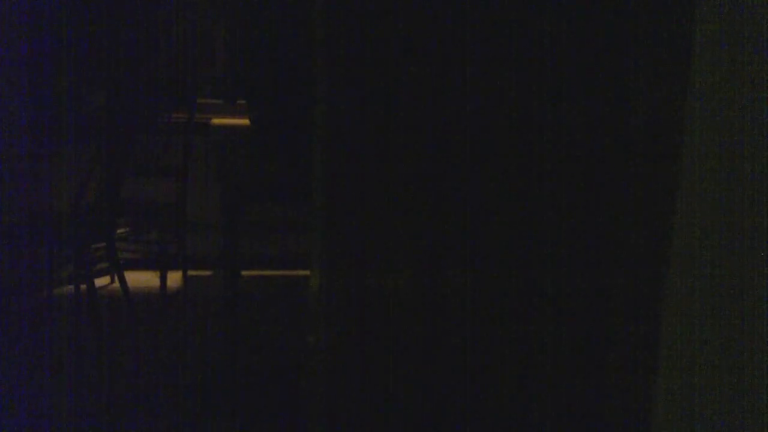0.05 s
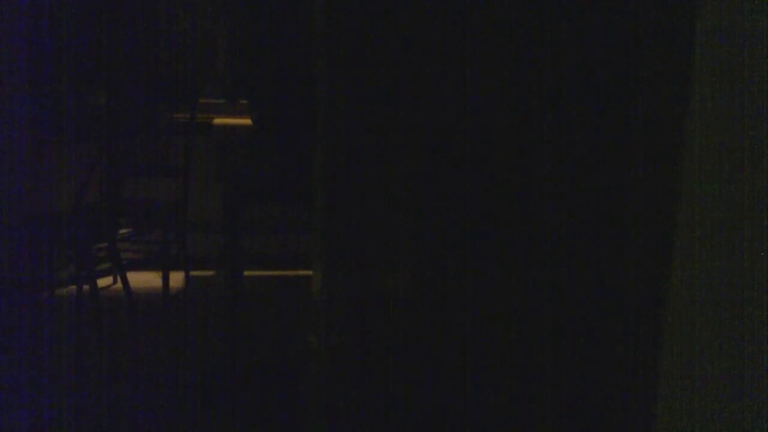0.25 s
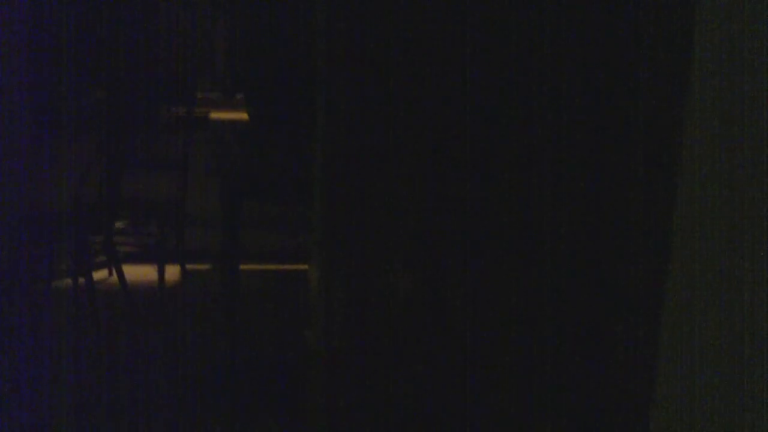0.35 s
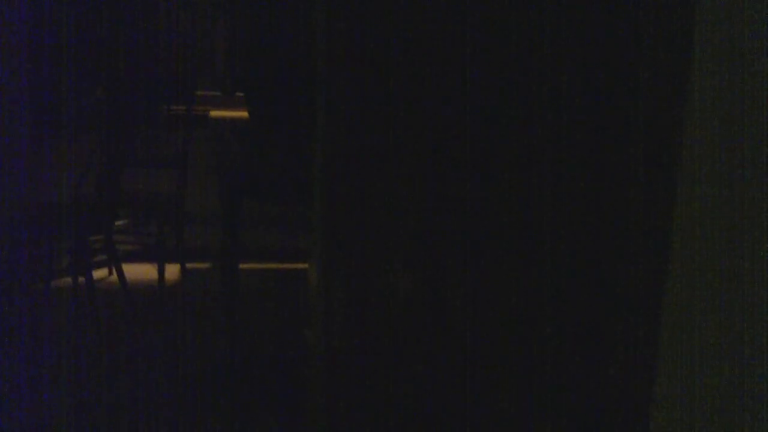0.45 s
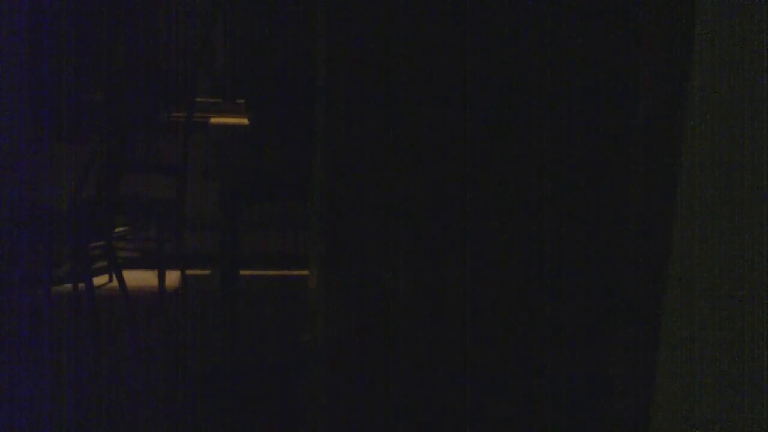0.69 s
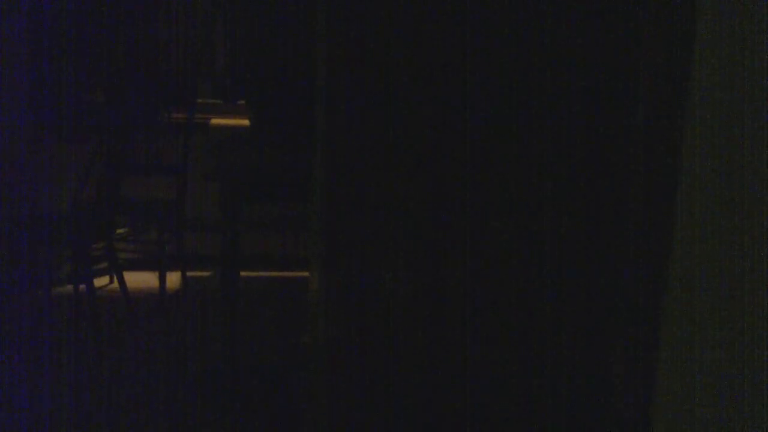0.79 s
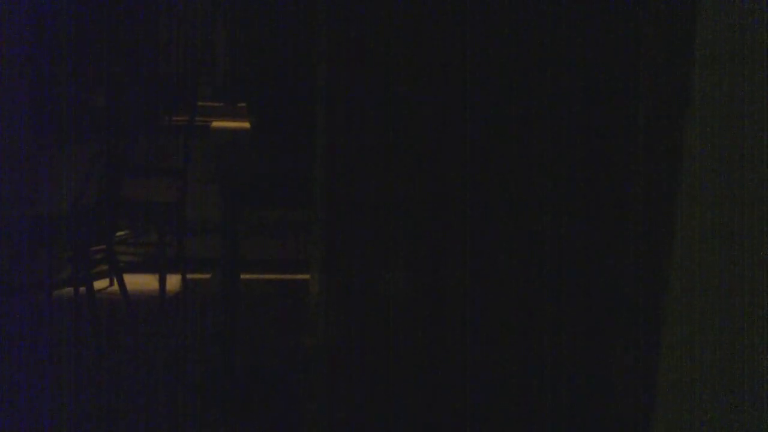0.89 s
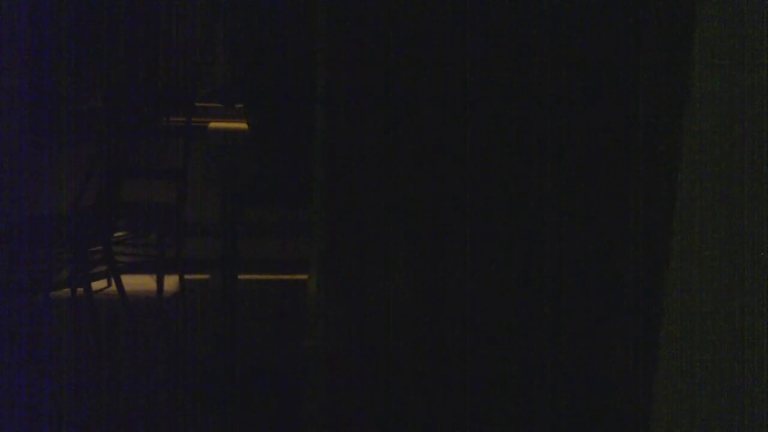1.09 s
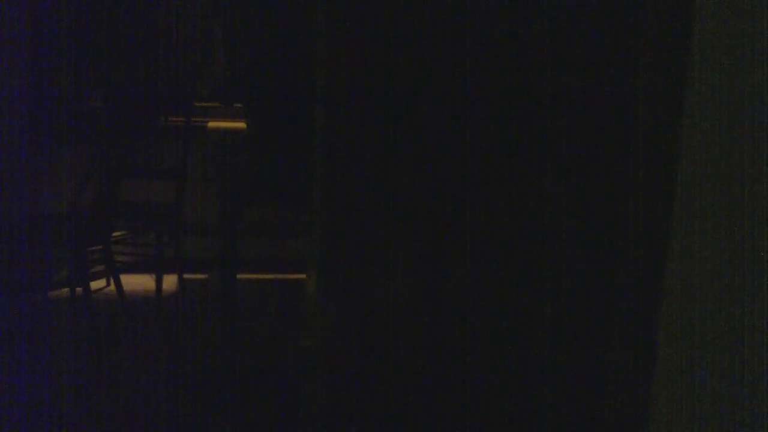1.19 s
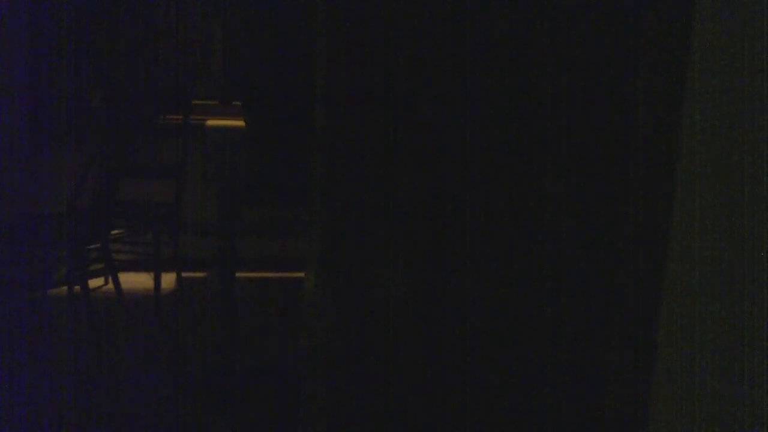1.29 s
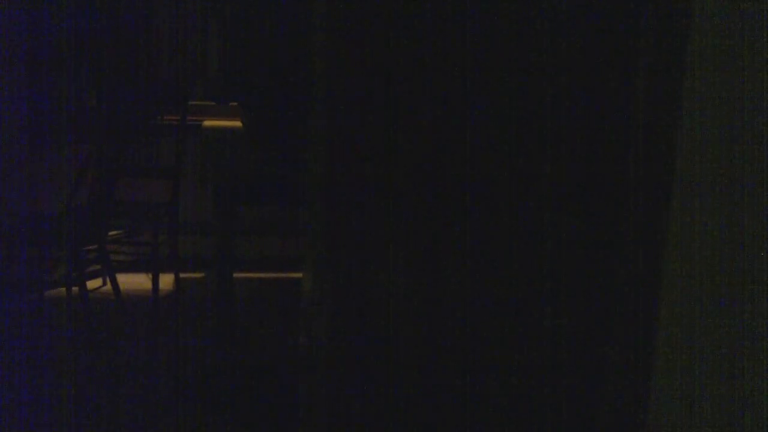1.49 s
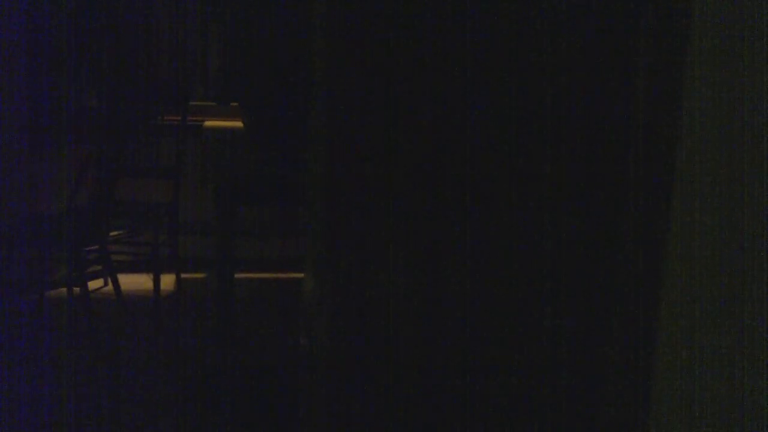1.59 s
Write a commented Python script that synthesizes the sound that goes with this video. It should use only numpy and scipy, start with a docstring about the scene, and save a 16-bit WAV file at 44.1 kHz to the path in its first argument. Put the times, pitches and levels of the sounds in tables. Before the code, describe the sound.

A puppy shut in a kennel yelps three times, hoarse and shrill, in a small hard room

```python
"""A yelp dies away with a faint tick, then a puppy shut in a kennel yelps three times in a small hard room,
some way from a camera. Each yelp starts as a hoarse chest voice (pulses and breath through mouth and throat),
breaks into a high whistle (a few sine partials) and drops back to a low grunt.
The room rings on (random taps and decaying sines). Under it lie mains hum, rumble, hiss,
the camera's pulsing whine (a gated sine), faint high chirps and soft low bumps."""
import sys
import numpy as np
from scipy import signal
from scipy.fft import rfft, irfft
from scipy.io import wavfile
from scipy.ndimage import uniform_filter1d

SR = 44100
rng = np.random.default_rng(int(sys.argv[2]) if len(sys.argv) > 2 else 0)


def master_out(mix):
    """Clip the mix to full scale and print it as 16-bit PCM to the path in sys.argv[1]."""
    frames = np.transpose(np.atleast_2d(mix))
    ceiling = np.clip(frames, -1, 1)
    pcm = np.round(ceiling * 32767).astype(np.int16)
    wavfile.write(sys.argv[1], SR, pcm)


def to_linear_factor(level_db):
    """Convert decibel levels (scalar or array-like) to linear amplitude factors."""
    exponent = np.asarray(level_db, float) / 20
    return 10 ** exponent


N = 72765  # samples
EDGE_HZ = 15020  # upper band limit


def evened(x):
    """Scales to rms 1."""
    return x / np.sqrt(np.mean(x ** 2) + 1e-20)


def read(points, hz):
    """Reads a spectrum table on a log-frequency axis."""
    f, value = np.transpose(points)
    return np.interp(np.log(hz + 1), np.log(f + 1), value)


def add(mix, start_s, sound):
    """Mixes a sound in at start_s."""
    part = mix[round(start_s * SR):][:len(sound)]
    part += sound[:len(part)]


def controls(rows):
    """Turns table rows into sample-rate curves, one per column after time."""
    rows = np.array(rows)
    t = np.arange(rows[0, 0], rows[-1, 0], 1 / SR)
    return [np.interp(t, rows[:, 0], column) for column in rows.T[1:]]


def wobble(count, size):
    """Smooth random wander of rms 1: white noise averaged twice over size samples."""
    white = rng.standard_normal(N)[:count]
    return evened(uniform_filter1d(uniform_filter1d(white, size), size))


def noise(points):
    """Steady noise with the given spectrum, rms 1."""
    z = rfft(rng.standard_normal(N))
    return evened(irfft(z * to_linear_factor(read(points, np.fft.rfftfreq(N, 1 / SR))), N))


def rumble():
    """Low-frequency noise, independent in mid and side."""
    # rumble spectrum: freq_hz, relative_db
    rumble_colour = [(10, 10), (25, 7), (45, -2), (60, 0), (90, -15.5), (125, -5), (260, -14), (400, -32),
                     (660, -67)]
    mid_db, side_re_mid_db = -53.5, -6
    mid = to_linear_factor(mid_db) * noise(rumble_colour)
    side = to_linear_factor(mid_db + side_re_mid_db) * noise(rumble_colour)
    return mid, side


def hiss():
    """Broadband noise; the mid flickers in level, the side is weaker and steady."""
    # mid hiss spectrum: freq_hz, relative_db
    mid_colour = [(300, -23), (3000, 10), (7300, -5.5), (7750, 12), (8300, -9.5), (11000, -5), (15000, -5)]
    # side hiss spectrum: freq_hz, relative_db
    side_colour = [(3000, -30), (6000, 0), (9000, 3), (12500, -0.5), (15000, 2)]
    mid_db, side_re_mid_db, flicker_db = -61, -16, 2
    mid = to_linear_factor(mid_db + flicker_db * wobble(N, size=120)) * noise(mid_colour)
    side = to_linear_factor(mid_db + side_re_mid_db) * noise(side_colour)
    return mid, side


def hum():
    """Steady mains hum: sines at random phase."""
    # hum tones: freq_hz, rms_db
    hum_tones = [(50, -56.5), (120, -74)]
    t = np.arange(N) / SR
    return sum(np.sqrt(2) * to_linear_factor(db) * np.sin(2 * np.pi * (hz * t + rng.random())) for hz, db in hum_tones)


def camera_whine():
    """High sine gated on and off at a fixed rate, with softened edges."""
    whine_hz, rms_on_db = 12000, -71
    first_s, period_s, on_s = .0585, 1 / 15, .031
    t = np.arange(N) / SR
    gate = uniform_filter1d(1. * ((t - first_s) % period_s < on_s), size=60)
    return np.sqrt(2) * to_linear_factor(rms_on_db) * gate * np.sin(2 * np.pi * whine_hz * t)


def thumps():
    """Soft low bumps: about two sine cycles under a half-sine envelope."""
    # bumps: start_s, envelope_peak_db
    bump_events = [(.29, -41), (0.324, -44), (0.375, -44), (0.441, -44.5)]
    bump_hz, length_s = 43.1, 0.047
    t = np.arange(0, length_s, 1 / SR)
    bump = np.sin(np.pi * t / length_s) * np.sin(2 * np.pi * bump_hz * t)
    out = np.zeros(N)
    for start_s, peak_db in bump_events:
        add(out, start_s, to_linear_factor(peak_db) * bump)
    return out


def chirps():
    """Faint short bursts of one fixed high tone."""
    # chirps: start_s, peak_db
    chirp_events = [(0.0194, -57), (0.1047, -58.5), (0.623, -62), (1.1059, -56), (1.6242, -57)]
    chirp_hz, length_s = 7770, .016
    t = np.arange(0, length_s, 1 / SR)
    chirp = np.sin(np.pi * t / length_s) ** .5 * np.sin(2 * np.pi * chirp_hz * t)
    out = np.zeros(N)
    for start_s, peak_db in chirp_events:
        add(out, start_s, to_linear_factor(peak_db) * chirp)
    return out


def tick():
    """One tick: a few high modes, each a decaying sine."""
    # tick modes: freq_hz, relative_db, t60_s
    tick_modes = [(6100, -12.5, 0.018), (9400, -1, 0.005), (11100, -10, 0.0066), (13500, -7, .006)]
    start_s, tick_db, length_s = .012, -31, .016
    t = np.arange(0, length_s, 1 / SR)
    ring = sum(to_linear_factor(tick_db + db - 60 * t / t60_s) * np.sin(2 * np.pi * hz * t) for hz, db, t60_s in tick_modes)
    out = np.zeros(N)
    add(out, start_s, ring)
    return out


def room():
    """Impulse response: direct sound, a dense tail dying by band, and the strongest standing waves."""
    # tail decay time: freq_hz, t60_s
    tail_t60 = [(300, 1), (800, 0.47), (2000, 0.51), (5500, 0.46), (14000, 0.6)]
    # tail spectrum at its start: freq_hz, relative_db
    tail_colour = [(300, -18.5), (600, -6.5), (900, 0.5), (5000, -1.5), (14000, -0.5)]
    # standing waves: freq_hz, relative_db
    standing_waves = [(571, -34.5), (612, -33), (673, -33), (732, -37), (802, -42.5), (893, -31),
                      (1001, -58), (1121, -40), (1351, -28.5), (1637, -33), (1770, -33.5), (1943, -28.5),
                      (2304, -30.5), (2471, -27), (3525, -38.5)]
    direct_db, tail_db, modes_db, mode_width_hz = -6, -1.5, -14.5, 12.9
    t = np.arange(SR) / SR
    # one tap of random sign at a random place in every 20 samples
    slots = (SR - 101) // 20
    taps = np.zeros(SR)
    taps[np.arange(100, SR - 20, 20) + rng.integers(0, 20, slots)] = rng.choice([-1., 1.], slots)
    hz, frame_s, z = signal.stft(taps, SR, nperseg=256)
    decay_db = -60 * frame_s / read(tail_t60, hz)[:, None]
    z = z * to_linear_factor(read(tail_colour, hz)[:, None] + decay_db)
    tail = signal.istft(z, SR, nperseg=256)[1][:SR]
    decay = np.exp(-np.pi * mode_width_hz * t)
    modes = sum(to_linear_factor(db) * decay * np.sin(2 * np.pi * f * t) for f, db in standing_waves)
    out = to_linear_factor(tail_db) * tail / np.linalg.norm(tail) + to_linear_factor(modes_db) * modes / np.linalg.norm(modes)
    out[0] += to_linear_factor(direct_db)
    return out


def rasp(rows):
    """Air tearing through the narrowed throat, in uneven grains."""
    # breath spectrum: freq_hz, relative_db
    rasp_colour = [(900, -8.5), (2000, -0.5), (4300, -2), (4900, -33), (6000, -14.5), (9000, -27),
                   (12000, -23), (15000, -34)]
    grain_db = 3
    level_db, = controls(rows)
    grains = grain_db * wobble(len(level_db), size=60)
    return to_linear_factor(level_db + grains) * noise(rasp_colour)[:len(level_db)]


def whistle(rows):
    """A nearly pure high tone with a few overtones and a little air."""
    # overtone spectrum: freq_hz, relative_db
    overtone_colour = [(2300, -5.5), (3300, -16), (3550, -6), (4200, -19), (4900, -19), (5250, -20.5),
                       (5700, -33), (6500, -21.5), (7100, -34.5), (8000, -41.5), (9800, -38.5),
                       (15000, -60)]
    jitter, air_db = .009, -27.5
    clear_from_hz, veil_db_per_oct = 1600, 180  # below this pitch overtones 3 and up are veiled
    hz, level_db, over_db = controls(rows)
    turns = np.cumsum(hz * (1 + jitter * wobble(len(hz), size=150))) / SR
    veil_db = veil_db_per_oct * np.minimum(np.log2(hz / clear_from_hz), 0)
    tone = np.cos(2 * np.pi * turns)
    for k in range(2, 10):
        gain_db = over_db + read(overtone_colour, k * hz) + (k > 2) * veil_db
        tone = tone + to_linear_factor(gain_db) * (k * hz < EDGE_HZ) * np.cos(2 * np.pi * k * turns)
    air = 1 + to_linear_factor(air_db) * wobble(len(hz), size=6)
    return np.sqrt(2) * to_linear_factor(level_db) * tone * air


def mouth_and_throat(drive, level_db, mouth_hz, slope_db_per_oct):
    """Time-varying filter on fold pulses and breath: mouth resonance, throat colour, treble by effort."""
    # throat response: freq_hz, gain_db
    throat_colour = [(200, -40), (330, 22), (500, 12.5), (1400, 4), (2200, 3.5), (3600, -2), (4250, -12),
                     (4600, -16.5), (5100, -14), (5900, -19), (7700, -24.5), (8600, -27), (15000, -45)]
    mouth_width_hz, below_mouth_db_per_oct = 700, 29.5
    far_slope_share = 0.37  # beyond the first octave over the mouth the slope changes in proportion
    breath_ease = 0.83  # the breath loses less treble than the pulses
    treble_from_hz, treble_per_effort, full_effort_db = 570, 0.28, 2.5  # quiet voice is also duller
    f, t, (z, air) = signal.stft(drive, SR, nperseg=512, noverlap=448)
    f = f[:, None]
    at = np.minimum(np.round(t * SR).astype(int), len(level_db) - 1)
    mouth_hz, slope = mouth_hz[at], slope_db_per_oct[at]
    octaves = np.log2((f + 1) / mouth_hz)
    z = z + air * to_linear_factor(-breath_ease * np.minimum(slope, 0) * np.clip(octaves, 0, 2))
    near_slope = np.where(octaves > 0, slope, below_mouth_db_per_oct)
    bent_octaves = np.where(octaves > 1, 1 + far_slope_share * (octaves - 1), octaves)
    gain = to_linear_factor(read(throat_colour, f) + near_slope * bent_octaves)
    gain = gain * (1 + 1 / (1 + ((f - mouth_hz) / mouth_width_hz * 2) ** 2))
    duller_db = treble_per_effort * np.minimum(level_db[at] - full_effort_db, 0)
    z = z * gain * to_linear_factor(duller_db * np.clip(np.log2((f + 1) / treble_from_hz), 0, 2))
    # even out frame power so that the level curve alone sets loudness
    z = z / np.sqrt(uniform_filter1d(2 * (abs(z) ** 2).sum(0) / 1.5, size=9) + 1e-12)
    return signal.istft(z, SR, nperseg=512, noverlap=448)[1][:len(level_db)]


def chest(rows):
    """Uneven strong-weak fold pulses and puffs of air pass the mouth and throat."""
    jitter, shimmer_db, onset_s = .09, 2, .01
    hz, level_db, half, rough, mouth_hz, slope = controls(rows)
    half, rough = np.clip(half, 0, 1), np.clip(rough, 0, 1)
    # turns count at half the pitch: odd partials make pulses alternate strong-weak
    turns = np.cumsum(hz / 2 * (1 + jitter * (rough + 0.1426) * wobble(len(hz), size=80))) / SR
    folds = np.zeros(len(hz))
    for k in range(1, 60):
        share = half if k % 2 else 1
        folds += share * (k * hz < 32000) * np.cos(2 * np.pi * k * turns)
    puffs = (0.7 + np.exp(-(turns % 1) / 0.67)) * rng.standard_normal(N)[:len(hz)]
    drive = np.array([np.sqrt(1 - rough ** 2) * evened(folds), rough * evened(puffs)])
    voice = mouth_and_throat(drive, level_db, mouth_hz, slope)
    swell = np.minimum(np.arange(len(hz)) / SR / onset_s, 1)
    return swell * to_linear_factor(level_db + shimmer_db * wobble(len(hz), size=150)) * voice


def puppy():
    """All voice layers in the room; a yelp begun before the start ends as the sound opens."""
    # chest voice before the room, one table per yelp:
    # time_s, pitch_hz, level_db, half_pitch_share (0-1), roughness (0-1), mouth_hz, treble_slope_db_per_oct
    chest_yelps = [
        [(-.15, 741, -21, 1, 0.7, 776, 10), (-.03, 750, -30, 0.86, 0.26, 730, -6),
         (0.0, 711.6, -36, 0.3, 0.07, 696, 13.5), (.04, 518, -44.5, 0.9, 0.3, 500, 16)],
        [(.14, 605.5, -41.5, 1, 0.91, 950, -22), (.17, 682, -29.5, 1, 0.56, 800, 8),
         (.2, 789.7, -19, 1, 0.71, 727, 1), (.235, 860.2, -19, 1, 0.6, 820, 3),
         (.265, 656.6, -13.5, 1, 0.31, 920, 3), (.305, 662.9, -12, 0.28, 0.36, 864, 4),
         (.325, 444.6, -14, 1, 0.37, 850, 3), (.345, 453.5, -19, 1, 0.23, 900, 5.5),
         (.42, 454.5, -29.5, 1, 0.51, 1170, -14.5), (.5, 553.2, -34.5, 1, 0.66, 1050, 12),
         (.54, 472, -33, 0.92, 0.81, 693, -69)],
        [(.678, 550.6, -33.5, 0.5, 0, 600, -6), (.706, 670, -28, .05, 0.16, 702.2, 4),
         (.72, 765.2, -6.5, .05, 0.17, 780, -27), (.74, 805, -19, 0.4, 0.32, 765, 3.5),
         (.76, 809, -10, 0.4, 0.52, 796, 1.5), (.79, 639, -14.5, 0.12, 0.5, 926, -2.5),
         (.82, 642.7, -15, 1, 0.41, 939, 11.5), (.85, 666, -24, 1, 0.56, 1310, -14),
         (.9, 645.4, -25.5, 0.5, 0.54, 1300, -46), (.94, 543, -38.5, 1, 0.69, 720, -2),
         (.965, 458.2, -26, 1, 0.08, 508, 3), (.99, 425.8, -28.5, 0.3, 0.71, 490, -10),
         (1.015, 558, -32, 0.24, 1, 520, -15), (1.05, 372, -45, 0.2, 0.5, 467, -20)],
        [(1.17, 539.7, -35, 0.4, 0.33, 594, -5), (1.188, 580.7, -32.5, 0.8, 0.4, 597, -0.5),
         (1.204, 688.3, -22.5, 0.7, 0.11, 710, 0), (1.222, 739.9, -15.5, 0.62, 0.25, 706, -16),
         (1.27, 737.5, -17.5, 0.93, 0.55, 750, 0), (1.3, 755.6, -20.5, 0.2, 0.7, 800, -17.5),
         (1.34, 786.8, -54, 0.8, 0.12, 835, 22), (1.42, 794.8, -25.5, 0.2, 0.11, 844, 10.5),
         (1.445, 613.8, -49, .1, 0.6, 610, -16), (1.475, 471.7, -24, 0.8, 0.7, 487, 3),
         (1.495, 419.4, -45, 0.2, 0.65, 460, -23), (1.525, 570, -25, 0.4, 0.16, 540, -23),
         (1.542, 471, -78, 0.1, 0.38, 480, -14), (1.568, 532, -25.5, 0.7, 0.56, 480, -29),
         (1.61, 388, -75, 0.5, 0.2, 356, -14.5)],
    ]
    # whistle register before the room, one table per strand (the last yelp splits in two):
    # time_s, pitch_hz, level_db, overtones_db
    whistle_strands = [
        [(-.2, 1838, -40, -2), (-.15, 1898, -46, 19), (0.0, 1782, -36, -1)],
        [(.315, 1572, -13, -20), (.333, 1557, -13.5, -35.5), (.36, 1631, -23, 4), (.39, 1622, -13, -1),
         (.42, 1620, -46, -16), (.46, 1616, -28, -3), (.48, 1209, -25, -22), (.505, 1135, -38, -16),
         (.53, 1120, -64, 1)],
        [(.8, 1486, -14.5, -24), (.83, 1572, -14.5, -6.5), (.86, 1636, -24, 11), (.885, 1576, -24.5, -22),
         (.91, 1487, -20, -33), (.93, 1353, -29.5, -25), (.955, 1110, -20.5, -6.5), (.99, 1130, -78, -1)],
        [(1.25, 1265, -65, 5), (1.275, 1427, -17.5, -1), (1.295, 1410, -27, 9), (1.32, 1731, -17.5, -4.5),
         (1.345, 1752, -31.5, 11.5), (1.39, 1740, -19.5, -0.5), (1.43, 1770, -27, 1), (1.45, 1824, -35, -5)],
        [(1.32, 1662, -51, -5), (1.345, 1682, -19, 3), (1.38, 1612, -22.5, 0.5), (1.405, 1295, -34, 5.5),
         (1.435, 1151, -26, -9), (1.455, 1112, -24, -8), (1.49, 1065, -78.5, -23)],
    ]
    # breath rasp before the room as each yelp climbs: time_s, level_db
    rasp_climbs = [
        [(.15, -48), (.21, -36), (.27, -36)],
        [(.68, -43), (.72, -42.5), (.77, -31.5)],
        [(1.18, -45), (1.231, -40), (1.291, -31), (1.339, -54), (1.4, -62)],
    ]
    lead_s = .3  # run-in, cut off after the room
    lead = round(lead_s * SR)
    dry = np.zeros(N + lead)
    for voice, tables in ((chest, chest_yelps), (whistle, whistle_strands), (rasp, rasp_climbs)):
        for rows in tables:
            add(dry, rows[0][0] + lead_s, voice(rows))
    return signal.fftconvolve(dry, room())[lead:lead + N]


def scene():
    """Everything in the middle; only rumble and hiss differ a little left to right."""
    rumble_mid, rumble_side = rumble()
    hiss_mid, hiss_side = hiss()
    small_sounds = hum() + camera_whine() + thumps() + chirps() + tick()
    mid = rumble_mid + hiss_mid + small_sounds + puppy()
    side = rumble_side + hiss_side
    return np.array([mid + side, mid - side])


def top_cut(x):
    """Nothing passes above the cut-off."""
    return signal.sosfilt(signal.butter(12, 15160, fs=SR, output="sos"), x)


def record(dry):
    """Soft ceiling on the loudest peaks, small constant offset, band limit."""
    ceiling, offset = .99, .0007  # full scale = 1
    limited = dry / (1 + (dry / ceiling) ** 10) ** (1 / 10)
    low_pass = signal.firwin(511, EDGE_HZ, window=("kaiser", 9), fs=SR)
    mix = signal.oaconvolve(limited + offset, low_pass[None], "same")
    return top_cut(mix)


dry = scene()
out = record(dry)
master_out(out)
```